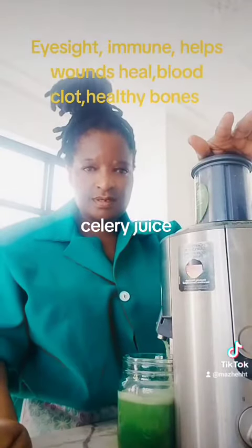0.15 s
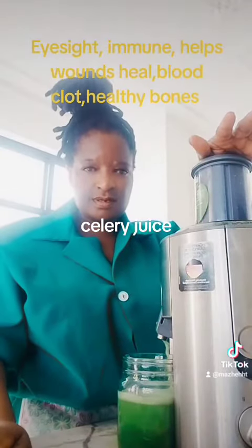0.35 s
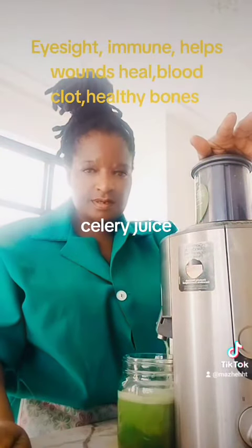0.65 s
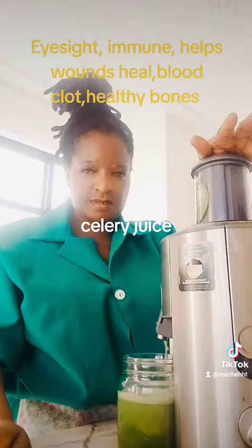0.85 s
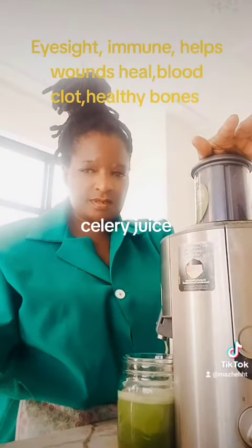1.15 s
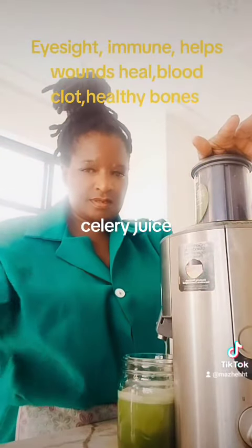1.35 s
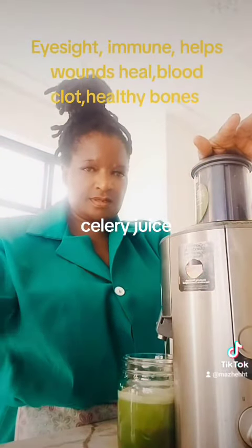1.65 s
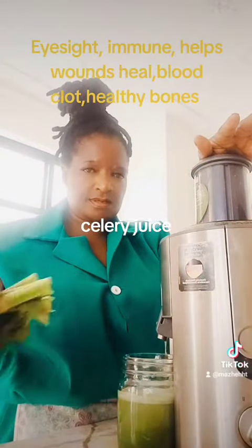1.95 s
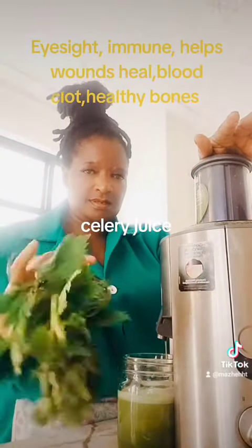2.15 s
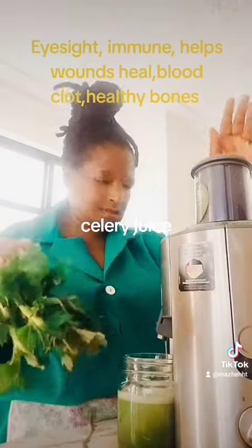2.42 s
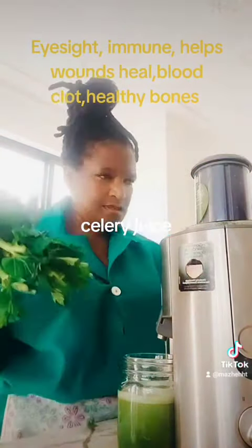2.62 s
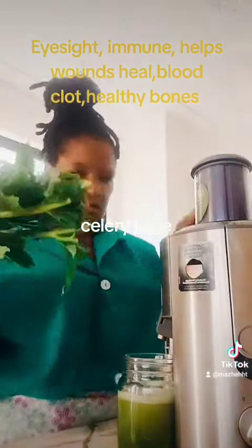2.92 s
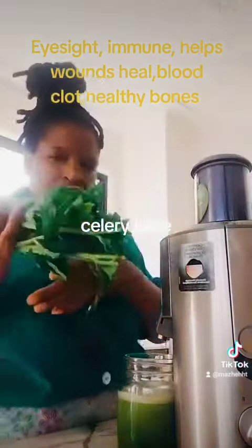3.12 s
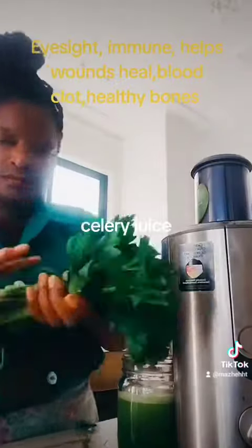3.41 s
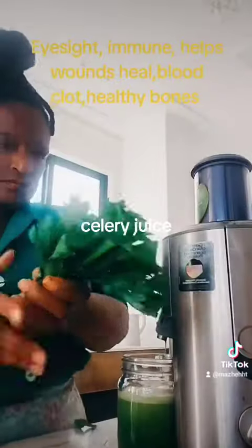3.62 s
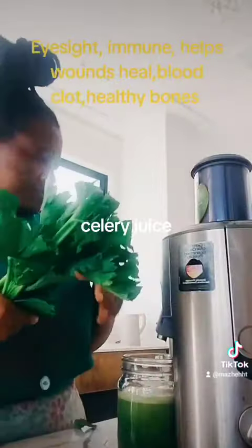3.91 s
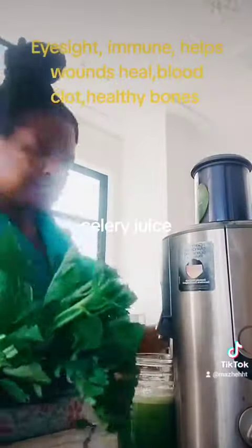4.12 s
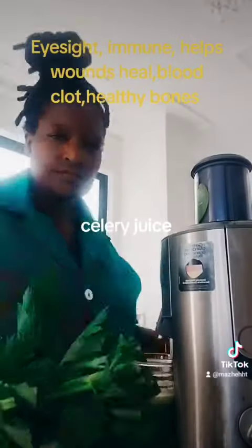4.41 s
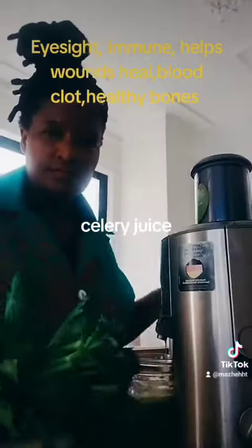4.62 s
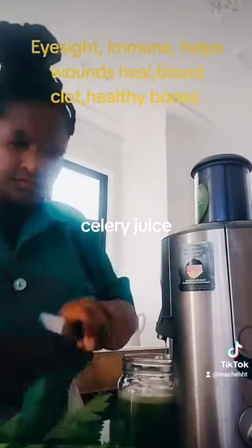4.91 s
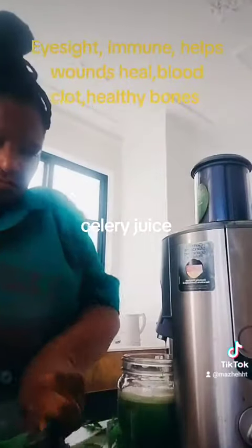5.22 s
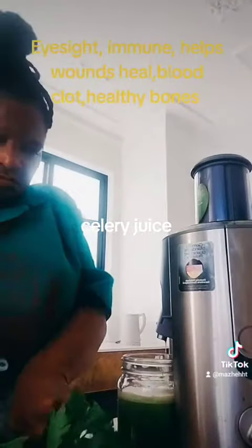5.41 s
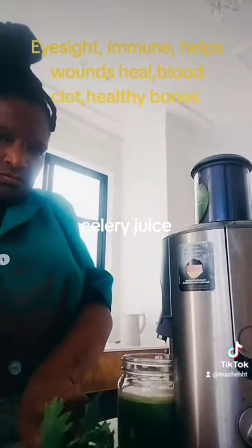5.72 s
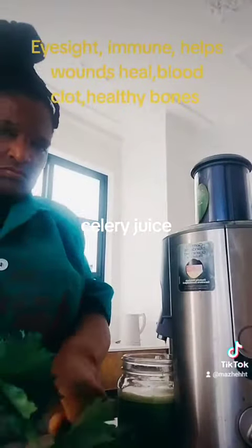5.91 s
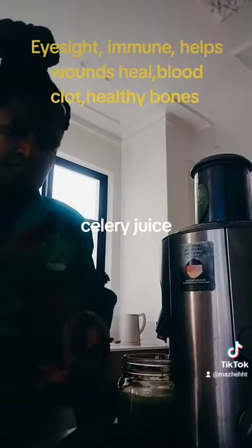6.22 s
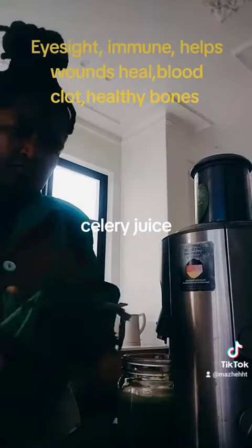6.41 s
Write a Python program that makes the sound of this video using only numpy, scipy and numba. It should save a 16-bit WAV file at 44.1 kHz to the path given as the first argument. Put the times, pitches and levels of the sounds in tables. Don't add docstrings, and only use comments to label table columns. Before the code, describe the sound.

A close kitchen juicer hums and whines steadily, lifts slightly faster after a soft knock, then a knife crunches through crisp stalks.

```python
import sys
import numpy as np
from scipy import signal
from scipy.fft import rfft, irfft, next_fast_len
from scipy.io import wavfile
from scipy.ndimage import uniform_filter1d
from numba import njit

SR = 44100
rng = np.random.default_rng(int(sys.argv[2]) if len(sys.argv) > 2 else 0)


def gain_from_db(level_db):
    decades = np.asarray(level_db, float) / 20
    return 10 ** decades


def generate_wav(sig):
    pcm = np.round(np.clip(np.atleast_2d(sig).T, -1, 1) * 32767).astype(np.int16)
    wavfile.write(sys.argv[1], SR, pcm)


N = 288855
STEP = 64
START_HZ = 118.65
BALLS_PER_TURN = 2.5975

# start_s, grip_eased (0-1), let_go (0-1), pulp_clear (0-1)
HOUSING = [
    (0, 0.19, 0, .01),
    (1.0, 0.08, 0.08, .01),
    (1.15, 0.63, 0.16, .01),
    (1.9, 0.85, 0.08, .01),
    (2.1, 1, 0.1, .01),
    (2.27, 0.6, .01, .01),
    (2.3, .99, 0.9, 0.25),
    (3.0, 0.9, .99, 0.04),
    (3.6, .99, 0.94, 0.78),
    (6.55, 0.6, 0.9, 1),
]


def clock():
    return np.arange(N // STEP + 2) * STEP / SR


def in_time(rows):
    s, *columns = np.transpose(rows)
    return [np.interp(clock(), s, c) for c in columns]


def fine(control):
    return np.interp(np.arange(N) / STEP, np.arange(len(control)), control)


def at_hz(points, hz, axis=1):
    points = np.array(points)
    return np.interp(np.log(hz), np.log(points[:, 0]), points[:, axis])


def drift(rate):
    r = np.exp(-2 * np.pi * STEP * rate / SR)
    slow = signal.lfilter([1], [1, -2 * r, r * r], rng.standard_normal(N // STEP + 2002))[2000:]
    return slow / np.sqrt(np.mean(slow ** 2) + 1e-20)


def speed():
    let_go_s, creep_hz_per_s = 2.31, .3
    free_hz, settle_s = 120.99, .88
    held = START_HZ + creep_hz_per_s * np.minimum(clock(), let_go_s)
    return free_hz + (held - free_hz) * np.exp(-np.maximum(clock() - let_go_s, 0) / settle_s)


@njit
def sines(turns, left, right, lead, size, step):
    out = np.empty((2, size))
    for n in range(size):
        k, part = n // step, (n % step) / step
        if part == 0:
            pointer = np.exp(2j * np.pi * (turns[k] % 1))
            turn = np.exp(2j * np.pi * (turns[k + 1] - turns[k]) / step)
        out[0, n] = (left[k] + part * (left[k + 1] - left[k])) * (pointer * lead[k]).imag
        out[1, n] = (right[k] + part * (right[k + 1] - right[k])) * pointer.imag
        pointer *= turn
    return out


def tone(turns, left_db, right_db, lead, start=None):
    left, chance = np.sqrt(2) * gain_from_db(left_db), rng.random()
    start = chance if start is None else start
    return sines(turns + start, left, left * gain_from_db(right_db), np.exp(1j * (lead + 0 * turns)), N, STEP)


def singing(turns):
    # gripped_db, eased_db, freed_db, swell_db, peak_hz (rotor speed at resonance)
    singers = [
        (-56, -59, -49.5, -2.5, 120.5),
        (-59, -54, -54, 5.5, 120.68),
        (-49, -49.5, -48, -5, 120.7),
        (-45, -43.5, -48, 6.5, 120.1),
    ]
    # rotor_hz, right_minus_left_db, left_lead_rad
    tenth_path = [(118.7, -1, -.6), (119.2, -2, .4), (119.35, -6, 1.7), (119.75, -6, 1.5),
                  (120.25, -1, 1.7), (120.7, -9, 2.5), (120.85, -20, 3.5), (120.93, -13, 4.6)]
    (eased, let_go, clear), hz = in_time(HOUSING), speed()
    orders = 10, 16, 9 * BALLS_PER_TURN, 11 * BALLS_PER_TURN
    loaded_right_db, clear_right_db = (0.0, -4, -14, -17), (-19, -23, -16, -20)
    leads = -.2, .5, 1.4, -2.5
    width_hz, waver_db = .25, .8
    out = 0
    for k, (gripped_db, eased_db, freed_db, swell_db, peak_hz) in enumerate(singers):
        held = gripped_db + eased * (eased_db - gripped_db)
        level = held + let_go * (freed_db - held) + waver_db * drift(1.5) + .6 * drift(12)
        level += swell_db * np.exp(-((hz - peak_hz) / width_hz) ** 2)
        right_db = loaded_right_db[k] + clear * (clear_right_db[k] - loaded_right_db[k])
        lead = leads[k]
        if k == 0:
            path_hz, path_db, path_lead = np.transpose(tenth_path)
            right_db, lead = np.interp(hz, path_hz, path_db), np.interp(hz, path_hz, path_lead)
        out = out + tone(orders[k] * (turns + .0003 * drift(9.0)), level, right_db, lead)
    return out


def whine(turns, table, per_turn, settle_db, flutter_db, wander):
    # multiple_of_turn, rotor_hz, width_hz, swell_db
    crossings = [(4, 119.36, .06, -6), (5, 119.7, .3, -8), (8, 119.35, .15, -4), (8, 120.75, .35, -5),
                 (13, 120.95, .1, 3), (14, 119.7, .25, -12), (14, 120.9, .25, -6), (23, 120.8, .15, -6),
                 (24, 119.6, .3, 7), (29, 119.25, .2, 2), (29, 120.8, .3, -4), (29.825, 120.1, .3, 3),
                 (29.825, 120.83, .07, -4), (33.77, 120.35, .15, 2), (33.77, 120.8, .18, -3),
                 (36.37, 119.7, .2, -8), (43, 119.25, .12, -6)]
    # frequency_hz, left_lead_rad
    leads = [(300, .2), (830, .55), (950, -1.5), (1240, -.8), (1430, -3.6), (1720, -3.1), (1770, -5.3),
             (1950, -5.4), (2040, -2.4)]
    strike_from, strike_spread = 36.5, .15
    eased, let_go, clear = in_time(HOUSING)
    out, hz, rock = np.zeros((2, N)), speed(), wander * drift(9.0)
    for multiple, gripped_db, eased_db, loose_db, right_db in table:
        order = multiple * per_turn
        held = gripped_db + eased * (eased_db - gripped_db)
        free = loose_db + clear * settle_db
        late_s = .53 if 14.5 < order < 15.5 else rng.random() / order
        freed = np.pad(let_go, (int(late_s * SR / STEP), 0), "edge")[:len(let_go)]
        level = held + freed * (free - held) + flutter_db * (drift(2.0) + 0.56 * drift(12))
        for met, met_hz, width_hz, swell_db in crossings:
            if abs(met - order) < .05:
                level += swell_db * np.exp(-((hz - met_hz) / width_hz) ** 2)
        lead = at_hz(leads, order * START_HZ) + rng.normal(0, .25)
        if order > strike_from and order == multiple:
            start = strike_spread * rng.normal() - lead / (2 * np.pi)
            out += tone(order * (turns + rock), level, right_db, lead, start)
        else:
            out += tone(order * (turns + wander * drift(9.0)), level, right_db, lead)
    return out


def cutter_teeth(turns):
    # multiple_of_turn, gripped_db, eased_db, freed_db, right_minus_left_db
    teeth = [(3, -50, -52, -54, -2.5), (4, -52, -54.5, -52.5, 2), (7, -59.5, -63, -61, -3),
             (8, -52, -55, -64, 0), (12, -67, -67, -53.5, -5), (14, -47.5, -47, -57, -9),
             (15, -61, -63, -52, -9), (17, -69, -66, -63, -4), (18, -65, -63, -56, -5),
             (19, -66, -69, -66, -6), (20, -64, -63, -62, -4), (21, -64, -61, -62, -9),
             (22, -57, -59, -67, -5), (24, -62, -54, -62, -6), (25, -61, -55, -64, -12)]
    return whine(turns, teeth, 1, -5, flutter_db=1.3, wander=.0003)


def brush_buzz(turns):
    # multiple_of_turn, gripped_db, eased_db, freed_db, right_minus_left_db
    brushes = [(27, -60.5, -59, -70, -11), (28, -60.5, -59, -57, -15), (29, -58, -51, -56, -17),
               (30, -56, -54, -60, -17), (33, -58, -56, -60, -14), (34, -53, -59, -60, -14),
               (35, -67, -60, -70, -7), (36, -55.5, -57, -63, -10), (37, -65, -70, -70, -9),
               (38, -68, -62, -72, -17), (39, -55, -61, -68, -16), (40, -57, -58, -67, -15),
               (41, -56, -65, -71, -16), (42, -52, -62, -75, -18), (43, -52, -58, -75, -17),
               (44, -62, -68, -72, -17), (45, -55.5, -52.5, -80, -18), (46, -57, -66, -82, -18),
               (47, -61, -62, -77, -14), (48, -55.5, -71, -85, -18), (49, -68, -73, -65, -14)]
    return whine(turns, brushes, 1, -5, flutter_db=1.3, wander=.0003)


def bare_rotor(turns):
    # multiple_of_turn, gripped_db, eased_db, freed_db, right_minus_left_db
    rotor = [(5, -47, -52.5, -56.5, 1), (6, -80, -72, -63, 3), (9, -60, -59, -64, -9),
             (13, -59, -59, -59.5, -7), (23, -53, -53, -56.5, -12), (26, -52.5, -52, -61.5, -9),
             (31, -50, -50.5, -63, -19), (32, -48, -52, -63, -21)]
    return whine(turns, rotor, 1, 0, flutter_db=1.0, wander=.0003)


def bearing(turns):
    # multiple_of_ball_pass, gripped_db, eased_db, freed_db, right_minus_left_db
    balls = [(1, -49.5, -51, -56, -.5), (2, -54, -55, -52.5, -1), (4, -59, -56, -57.5, -3),
             (7, -72, -69, -66, -10), (8, -60, -63, -60, -13), (12, -54, -55, -58, -17),
             (13, -49, -49, -48.5, -21), (14, -60, -62, -53, -14), (16, -76, -66, -67, -18),
             (19, -58, -58, -57, -19)]
    return whine(turns, balls, BALLS_PER_TURN, -4.5, flutter_db=1.2, wander=.0003)


def side_tones(turns):
    # multiple_of_turn, gripped_db, eased_db, freed_db, right_minus_left_db
    sidebands = [(5.4, -56, -56, -60, -4), (6.825, -71, -73, -64, -11), (8.8, -64, -64, -68, -1),
                 (16.85, -63, -65, -73, -18), (18.6, -68, -74, -64, -20), (23.75, -70, -64, -69, -16),
                 (25.425, -65, -63, -64, -11), (26.4, -68, -68, -63, -15), (28.2, -72, -67, -61, -17),
                 (29.825, -49, -54, -53, -23), (30.825, -51, -58, -59, -20), (32.8, -69, -69, -64, -26),
                 (33.4, -75, -70, -62, -23), (34.175, -64, -62, -61, -23)]
    return whine(turns, sidebands, 1, -3, flutter_db=1.5, wander=.0004)


def faint_balls(turns):
    clear = in_time(HOUSING)[2]
    out = 0
    for k in range(20, 25):
        level = -73 - 5 * clear + 2.5 * drift(2.0)
        out = out + tone(k * BALLS_PER_TURN * turns, level, -10.5, lead=k)
    return out


def unbalance(turns):
    # start_s, level_db
    twice = [(0.0, -32.5), (0.9, -33.5), (1.8, -35.5), (2.26, -33.5), (2.5, -35.5), (2.63, -41),
             (2.72, -40), (2.88, -32.5), (3.28, -28.5), (4.65, -29.5), (5.33, -30.5), (5.4, -31.5),
             (6.55, -31.5)]
    _, let_go, clear = in_time(HOUSING)
    held_db, free_db, waver_db = -38.5, -42, 1.0
    once = held_db + let_go * (free_db - held_db) - 1.2 * clear + waver_db * drift(3.0)
    rebound_s, rebound_db, rebound_width_s = 2.385, -12, .03
    once += rebound_db * np.exp(-((clock() - rebound_s) / rebound_width_s) ** 2)
    out = tone(turns, once - .8, 1.7, lead=0.18)
    return out + tone(2 * turns, in_time(twice)[0] - .9, 1.5, lead=0.31)


def mains_hum():
    _, let_go, clear = in_time(HOUSING)
    loaded_db, clear_db, waver_db = -46, -57, 2.5
    level = loaded_db - 1.5 * let_go + 1.2 * drift(1.5)
    level += clear * (clear_db - loaded_db + waver_db * drift(1.5))
    hum = 100.2 * clock()
    out = tone(hum, level - 1.5, 3.4, lead=0.089)
    out += tone(4 * hum, 3.5 * drift(1.5) - 61, 1.5, lead=.3)
    return out + tone(2 * hum, 3.5 * drift(4.0) - 56, 1.1, lead=.2)


def wind(turns):
    # frequency_hz, level_db
    wind_colour = [(30, -20.5), (85, -10), (160, -1.5), (280, 1), (450, -6), (800, -13), (1500, -12),
                   (2500, -14.2), (3600, -15), (5200, -24), (8000, -10.5), (15500, -16)]
    # start_s, level_db
    load = [(0, .5), (1.8, 1), (2.25, 1.5), (2.35, 0), (2.76, -.5), (2.88, 2), (3.1, 0.5), (3.5, -1.5),
            (4.4, -2.5), (5.5, -1.5), (5.9, -2.5), (6.55, -1.5)]
    load_db, let_go = in_time(load)[0], in_time(HOUSING)[1]
    shake_db = -26 - 10 * let_go
    rumble_db, whoosh_db, hiss_db = load_db - 29.3, load_db - 25.5, load_db - 33.3
    out, together = 0, drift(4.0)
    edges = 25 * 2 ** np.arange(0, 9.6, .5)
    white = rng.standard_normal((2, 2, N))
    angle = 2 * np.pi * fine(turns)
    chop = 1 + .18 * np.sin(angle) + .22 * np.sin(2 * angle) + .1 * np.sin(3 * angle)
    for k, (low, high) in enumerate(zip(edges, edges[1:])):
        band_filter = signal.butter(2, [low, high], "band", fs=SR, output="sos")
        band = signal.sosfilt(band_filter, white[k % 2])
        hz = np.sqrt(low * high)
        if hz < 80:
            level = shake_db
        elif hz < 900:
            level = rumble_db
        else:
            level = whoosh_db if hz < 8000 else hiss_db
        flicker = 0.76 * together + 0.95 * drift(10)
        gain = fine(gain_from_db(at_hz(wind_colour, hz) + level + flicker))
        out = out + gain * band * (chop if hz > 2800 else 1)
    return out


def puff(clicks, swell):
    r = np.exp(-1 / (swell * SR))
    return signal.lfilter([(1 - r) * np.e], [1, -2 * r, r * r], clicks)


def knife():
    # give_s, crunch_db, build_up_s (per 20 dB)
    strokes = [
        (4.884, -48.5, .024),
        (5.296, -48, .03),
        (5.39, -39.5, .1),
        (5.56, -57, .04),
        (5.616, -57, .2),
        (5.655, -45.5, .06),
        (5.72, -45.5, .07),
        (5.75, -50, .05),
        (5.88, -62, .4),
    ]
    # start_s, peak_db, dullness_db
    snaps = [(1.6227, -42, 2), (2.908, -52, 8), (3.261, -37, -14), (4.8808, -41, -3), (5.2924, -37, -7),
             (5.3024, -42, -4), (5.339, -38.5, -0.5), (5.3475, -40, -11), (5.3608, -31, 1),
             (5.3734, -34, -7), (5.3784, -34, -4), (5.389, -39, -3), (5.397, -35, -6), (5.5493, -40, -3),
             (5.5692, -42, -6), (5.5746, -43, -9), (5.5921, -42, -9), (5.6371, -34, 4.5), (5.649, -28, -10),
             (5.6605, -28, -18), (5.693, -36, 2), (5.7004, -34, -4), (5.708, -24, -10), (5.7113, -38, -7),
             (5.7277, -41, -12), (5.742, -23, -19), (5.7437, -36.5, 0), (5.7574, -32, -10),
             (5.7911, -46, -9), (5.8546, -43, -4), (5.872, -38, -8)]
    pressure, t = 0, clock()
    for s, crunch_db, build in strokes:
        fall_db = np.where(t < s, 20 * (s - t) / build, 800 * (t - s))
        pressure = pressure + gain_from_db(crunch_db - fall_db)
    sizes = gain_from_db(2.5 * np.minimum(rng.exponential(1, N), 3))
    struck = rng.random(N) < 1500 / SR
    grains = fine(pressure) * sizes * struck + 1e-18
    bright, dull = gain_from_db(1.0) * grains, gain_from_db(-1.5) * grains
    for s, peak_db, dull_db in snaps:
        bright[round(s * SR)] += gain_from_db(peak_db + 2.5)
        dull[round(s * SR)] += gain_from_db(peak_db + dull_db + 8.5)
    for layer, through_db in ((bright, -24), (dull, -22)):
        layer[round(5.3885 * SR)] += gain_from_db(through_db)
    white = np.tanh(2 * rng.standard_normal((2, 2, N)))
    top_filter = signal.butter(2, 10500, "high", fs=SR, output="sos")
    body_filter = signal.butter(1, [1000, 6500], "band", fs=SR, output="sos")
    top = signal.sosfilt(top_filter, puff(bright, 0.00065) * white[0])
    return top + signal.sosfilt(body_filter, puff(dull, .001) * white[1])


def board():
    # start_s, level_db, thud_hz, swell_s
    thuds = [
        (2.271, -35.5, 350, 0.018),
        (5.385, -41, 72, 0.012),
        (5.645, -46, 70, 0.0091),
    ]
    t, out = np.arange(N) / SR, np.zeros(N)
    for s, level_db, hz, swell in thuds:
        age = np.maximum(t - s, 0)
        hump = age / swell * np.exp(1 - age / swell)
        out += gain_from_db(level_db) * hump * np.sin(2 * np.pi * hz * age)
    return out * gain_from_db([[-1.5], [1.5]])


def through_ports(mid, side):
    # frequency_hz, left_db, right_minus_left_db, likeness (left-right, 0-1)
    ports = [(30, 0, 2, .9), (86.5, -1.5, 8.5, .95), (280, 1, 2, 0.58), (425, -1, 2.5, 1), (834, 0, 0, 0),
             (1100, -3.5, -3, 0), (1500, 0, -4.5, -.1), (2540, -0.5, -8, 0.08), (3720, 4.5, -12, -.2),
             (5300, 3, -15.5, -.2), (6930, -12, -7, .01), (8230, -24, -2, 0.05), (9080, -13.5, -5.5, .01),
             (10480, -8.5, -4, .01), (15450, 4.5, -13.5, 0.05)]
    size = next_fast_len(N + 4096)
    hz = np.maximum(np.arange(size // 2 + 1) * SR / size, 1)
    alike = np.clip(at_hz(ports, hz, axis=3), -1, 1)
    shared = np.sqrt(1 + alike) * rfft(mid, size)
    opposed = np.sqrt(1 - alike) * rfft(side, size) * [[1], [-1]]
    left_db = at_hz(ports, hz)
    right_db = left_db + at_hz(ports, hz, axis=2)
    cepstrum = irfft(np.log(gain_from_db([left_db, right_db])), size)
    cepstrum[:, 1:size // 2] *= 2
    cepstrum[:, size // 2 + 1:] = 0
    colour = np.exp(rfft(cepstrum))
    return irfft((shared + opposed) * colour, size)[:, :N] / np.sqrt(2)


def thin_out(x):
    # frequency_hz, level_over_step_db
    steps = [(200, 46), (800, 20), (1600, 15), (3000, 20), (4400, 15), (5200, 12), (6200, 6), (7100, 1),
             (7700, -8), (8300, -13), (8900, -9), (9400, 0), (10300, -2), (11500, 3), (13000, 7),
             (15500, 6)]
    hop, start = 1024, 870
    n, k = np.arange(2 * hop), np.arange(hop)
    window = np.sin(np.pi * (n + .5) / (2 * hop))
    basis = window[:, None] * np.cos(np.pi / hop * np.outer(n + .5 + hop / 2, k + .5))
    padding = 2 * hop - start, 3 * hop - (N - start) % hop
    blocks = np.pad(x, ((0, 0), padding)).reshape(2, -1, hop)
    lines = np.concatenate([blocks[:, :-1], blocks[:, 1:]], axis=2) @ basis
    power = np.mean(lines.reshape(2, -1, 64, 16) ** 2, axis=3)
    band = np.sqrt(np.repeat(power, 16, axis=2))
    hz = (k + .5) * SR / (2 * hop)
    usual = np.median(band.max(axis=0), axis=0)
    chance = uniform_filter1d(rng.standard_normal((1, lines.shape[1], 64)), 2, axis=1)
    jitter = np.repeat(gain_from_db(6.5 * chance), 16, axis=2)
    step = np.maximum(usual, band / 2) * gain_from_db(-at_hz(steps, hz)) * jitter
    top_hz = np.where(band > 2 * usual, 15920, 15760)
    kept = (band > step / 6) & (hz < top_hz)
    lines = np.sign(lines) * np.floor(np.abs(lines) / step + .4) * step * kept
    halves = lines @ basis.T * 2 / hop
    out = halves[:, 1:, :hop] + halves[:, :-1, hop:]
    return out.reshape(2, -1)[:, hop - start:][:, :N]


def scene():
    turns = np.cumsum(speed()) * STEP / SR
    out = singing(turns) + cutter_teeth(turns) + brush_buzz(turns) + bare_rotor(turns)
    out += bearing(turns) + side_tones(turns) + faint_balls(turns)
    out += unbalance(turns) + mains_hum()
    return out + through_ports(*(wind(turns) + knife())) + board()


def band_limit(x):
    return signal.sosfilt(signal.butter(12, 15950, fs=SR, output="sos"), x)


def record(dry):
    mix = thin_out(dry)
    return band_limit(mix)


dry = scene()
out = record(dry)
generate_wav(out)
```